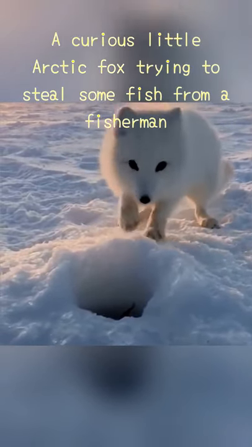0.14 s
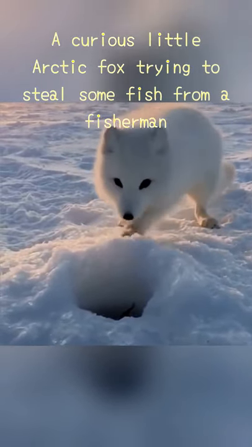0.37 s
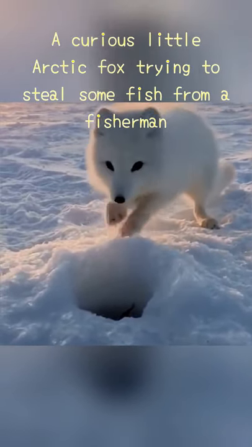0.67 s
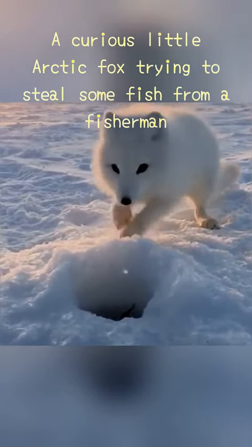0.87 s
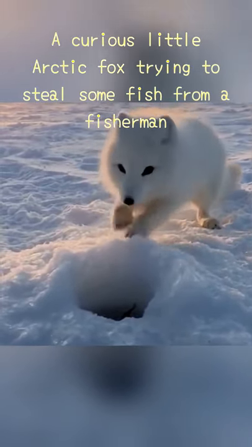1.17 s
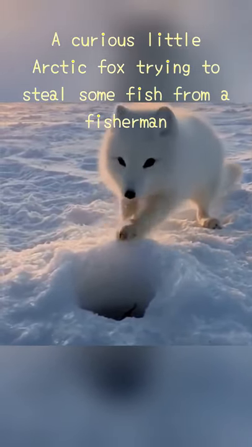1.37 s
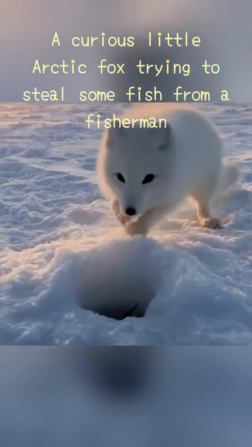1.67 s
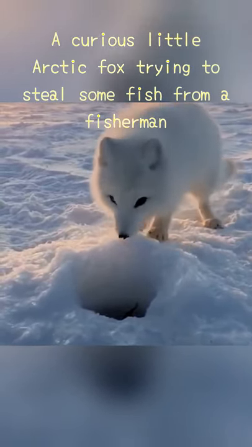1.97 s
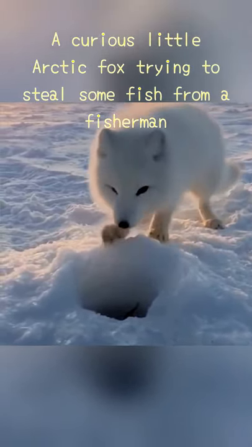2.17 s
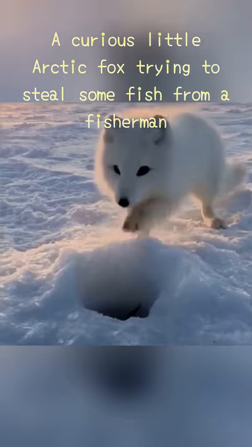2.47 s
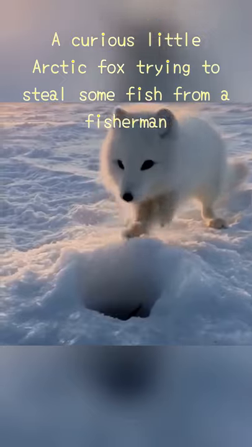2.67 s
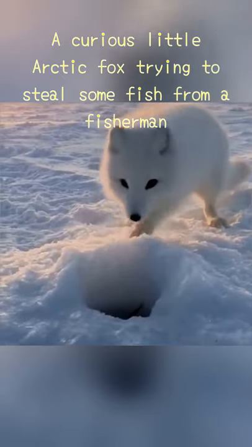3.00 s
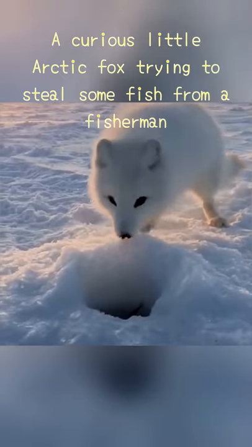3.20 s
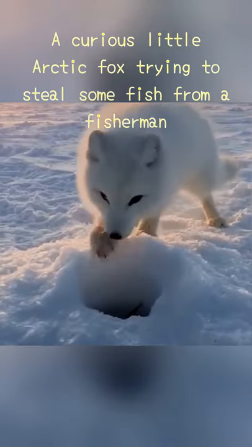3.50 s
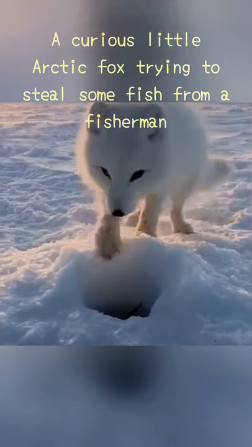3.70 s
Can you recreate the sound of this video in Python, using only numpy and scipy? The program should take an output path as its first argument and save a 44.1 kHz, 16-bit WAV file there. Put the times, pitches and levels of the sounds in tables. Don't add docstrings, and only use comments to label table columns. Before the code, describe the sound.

A fox's paws dig in quick bursts at packed snow, crunching and crackling close up.

```python
import sys
import numpy as np
from scipy import signal
from scipy.fft import rfft, irfft, next_fast_len
from scipy.io import wavfile
from scipy.ndimage import uniform_filter1d

SR = 44100
rng = np.random.default_rng(int(sys.argv[2]) if len(sys.argv) > 2 else 0)


def waveform_to_disk(signal):
    frames = np.transpose(np.atleast_2d(signal))
    scaled = np.clip(frames, -1, 1) * 32767
    samples = np.round(scaled).astype(np.int16)
    wavfile.write(sys.argv[1], SR, samples)


def voltage_ratio(level):
    return 10 ** (np.asarray(level, float) / 20)


N = 169785

# freq_hz, level_db
AIR_CURVE = [(120, -32), (200, -17), (500, -11.5), (900, -16), (5000, -20), (9000, -23.5), (12200, -30),
             (15500, -20)]
# freq_hz, level_db
WIND_CURVE = [(12, -45), (20, -30), (37, -3.5), (76, -5.5), (107, -3), (156, -11), (400, -29.5), (520, -42),
              (880, -120)]
# centre_s, half_width_s, level_db, pitch_hz
BUFFETS = [
    (3.79, 0.055, -47, 65),
    (2.168, 0.0028, -55.5, 450),
    (1.91, 0.018, -49, 110),
]
# freq_hz, level_db
CRUST_CURVE = [(500, -9), (1000, -7), (1400, -6.5), (3000, -3), (5500, -4.5), (8300, -5.5), (10500, -3),
               (12600, -4.5)]
# freq_hz, level_db
PACK_CURVE = [(35, -14), (60, -2.5), (150, -2.5), (340, -2.5), (534, -11), (900, -18), (1170, -68),
              (1980, -120)]
HOLLOW_RINGS_HZ = [1307, 1470, 1633, 2620, 3240]
# start_s, peak_db, pitch_hz
CRUMB_FALLS = [(0.1075, -47, 1330), (0.1125, -48.5, 8900), (0.264, -60, 8600), (0.168, -43, 10500),
               (0.1757, -37, 11200), (0.201, -44.5, 10300), (0.233, -52, 1300), (1.1242, -42, 1430),
               (1.1494, -32, 6430), (1.1498, -35, 2180), (1.1717, -32, 10100), (1.2463, -40.5, 2120),
               (1.965, -49, 1080), (2.0656, -45, 6600), (2.0822, -43, 12600), (2.1655, -54.5, 1260),
               (3.2055, -41, 3440), (3.2306, -40, 6150), (3.3114, -49, 2040), (3.438, -67, 11000),
               (3.491, -49, 12000), (3.5313, -47, 11900)]
# start_s, peak_db, pitch_hz
CRUST_SNAPS = [(0.3556, -28, 2500), (0.5066, -33, 2720), (0.701, -20.5, 10400), (0.7443, -25, 2820),
               (0.8225, -14, 10300), (0.858, -16.5, 1940), (1.2991, -20.5, 10400), (1.513, -17, 12500),
               (1.537, -25, 9900), (1.5428, -17.5, 10600), (1.6232, -25, 2550), (1.6543, -15, 10350),
               (1.7454, -15.5, 10700), (2.3233, -11.5, 10000), (2.3414, -20, 1910), (2.4185, -19, 12100),
               (2.4309, -16, 9340), (2.6782, -18.5, 2220), (2.7613, -18, 10200), (2.8811, -14, 12370),
               (2.8918, -37, 1380), (2.9924, -18.5, 3380), (3.1221, -21.5, 1470), (3.6391, -21.5, 4650),
               (3.691, -16, 10800), (3.8444, -29, 6000)]
# start_s, peak_db, pitch_hz
FOOTFALLS = [(0.004, -41, 205), (0.377, -39, 146), (0.53, -39, 167), (0.614, -38.5, 230), (0.74, -40, 143),
             (0.838, -36.5, 360), (0.966, -43, 91.5), (1.331, -34.5, 294), (1.395, -40, 342),
             (1.649, -33, 197.5), (1.749, -40.5, 279), (1.871, -41, 253), (2.318, -34.5, 160),
             (2.44, -36, 154), (2.522, -36.5, 242), (2.69, -37, 77.5), (2.765, -34, 350), (2.865, -42, 220),
             (2.976, -39.5, 303), (3.111, -36, 328), (3.647, -35, 91), (3.689, -41, 106)]
# start_s, peak_db
CLAW_CATCHES = [(0.0224, -45), (0.175, -52), (0.413, -33), (0.5387, -30), (0.5774, -41), (0.7076, -31),
                (0.842, -23), (0.8463, -25), (0.874, -27), (0.8819, -46), (1.006, -28), (1.279, -37),
                (1.3088, -23), (1.3185, -23), (1.402, -26), (1.4674, -46), (1.509, -24), (1.5489, -27),
                (1.6364, -30), (1.646, -34), (1.663, -37), (1.731, -24), (1.7365, -21), (1.7684, -43),
                (1.8004, -54), (1.8363, -51), (1.845, -44), (1.8971, -50), (2.2453, -41), (2.2775, -27),
                (2.301, -40), (2.3543, -46), (2.382, -31), (2.404, -21), (2.4477, -20), (2.5856, -41),
                (2.613, -29), (2.6345, -23), (2.6602, -51), (2.78, -26), (2.8198, -43), (2.85, -35),
                (2.858, -29), (2.873, -26), (2.9233, -45), (2.9446, -28), (2.978, -29), (2.9834, -36),
                (3.0049, -44), (3.1625, -36), (3.167, -29), (3.2051, -33.5), (3.2324, -38), (3.5878, -31),
                (3.6148, -30), (3.662, -33), (3.7088, -23), (3.8235, -36)]
# start_s, length_s, first_db, last_db
SLIDES = [
    (.66, 0.074, -52.5, -49.5),
    (1.12, 0.14, -56, -70),
    (1.9, 0.16, -51, -70),
    (3.165, 0.062, -51, -59),
    (3.215, 0.153, -59.5, -62.5),
    (1.482, 0.03, -69, -41),
    (2.06, 0.035, -67, -59.5),
    (1.69, .03, -81, -53),
    (2.642, 0.033, -58, -56),
    (2.19, 0.061, -59.5, -55),
]
# start_s, length_s, force_db
LIGHT_SCUFFS = [(0.034, 0.036, -60), (0.321, 0.0048, -56), (0.327, 0.016, -50.5), (0.346, 0.021, -46),
                (0.416, 0.053, -50.5), (0.475, 0.026, -47), (0.552, 0.064, -50.5), (0.698, 0.013, -44),
                (0.778, 0.043, -50.5), (0.914, 0.01, -48.5), (0.928, 0.019, -41.5), (0.95, 0.013, -52.5),
                (1.019, 0.07, -54.5), (1.276, 0.023, -51.5), (1.603, 0.023, -47), (1.707, .02, -55),
                (1.795, 0.061, -52.5), (1.836, 0.021, -52.5), (1.87, 0.039, -45.5), (2.203, 0.043, -65),
                (2.243, 0.032, -49), (2.38, 0.033, -46), (2.557, 0.054, -51.5), (2.72, 0.023, -52.5),
                (2.813, 0.015, -49), (2.736, 0.01, -62), (2.837, 0.021, -43), (2.915, 0.048, -47.5),
                (3.033, 0.012, -49.5), (3.046, 0.032, -62.5), (3.079, 0.027, -51.5), (3.144, 0.025, -45),
                (3.587, 0.014, -50.5), (3.607, 0.034, -52), (3.788, 0.02, -54), (3.82, 0.016, -52),
                (3.841, 0.02, -46.5)]
# start_s, length_s, force_db, thud_re_crackle_db, peak_place_0_1
DIG_STROKES = [
    (-.02, 0.053, -40, -16, 0.29),
    (0.369, 0.055, -42, -9.5, 0.56),
    (0.502, 0.045, -38.5, -9, 0.42),
    (0.607, 0.061, -40, -11, 0.56),
    (0.728, 0.05, -40.5, -3.5, 0.55),
    (0.807, 0.025, -52, -17, 1),
               (0.835, 0.052, -40.5, -5.5, 0.57), (0.961, 0.053, -41, -6, 0.3),
               (1.297, 0.068, -40, -6.5, 0.66), (1.364, 0.1, -40.5, -8.5, 0.56),
               (1.504, 0.09, -40.5, -8, 0.47), (1.622, 0.07, -41.5, -6.5, 0.55),
               (1.723, 0.073, -40.5, -5.5, 0.58), (2.275, 0.088, -38.5, -9, 0.55),
               (2.41, 0.07, -38.5, -9.5, 0.24), (2.485, 0.081, -40.5, -7.5, 0.59),
               (2.61, 0.031, -40, -10, 0.66), (2.67, 0.053, -42.5, -6, 0.33),
               (2.75, 0.064, -40, -5.5, 0.18), (2.859, 0.058, -38.5, -10.5, 0.5),
               (2.965, 0.066, -39.5, -7.5, 0.32), (3.101, 0.043, -43.5, -5.5, 0.37),
               (3.633, 0.082, -41.5, -6, 0.2)]


def evened(x):
    return x / np.sqrt(np.mean(x ** 2) + 1e-20)


def colour(x, points):
    f, level_db = np.transpose(points)
    hz = np.fft.rfftfreq(len(x), 1 / SR)
    gain = voltage_ratio(np.interp(np.log(hz + 1), np.log(f + 1), level_db))
    return evened(irfft(rfft(x) * gain, len(x)))


def add(mix, start_s, sound):
    at = round(start_s * SR)
    part, rest = mix[max(at, 0):], sound[max(-at, 0):]
    size = min(len(part), len(rest))
    part[:size] += rest[:size]


def wander(period_s):
    size = max(int(period_s * SR), 2)
    return evened(uniform_filter1d(uniform_filter1d(rng.standard_normal(N), size), size))


def linger(x, decay_s):
    keep = np.exp(-1 / (decay_s * SR))
    return signal.lfilter([1 - keep], [1, -keep], x)


def impacts(rate_per_s, spread_db, limit):
    size = voltage_ratio(spread_db * np.minimum(rng.exponential(1, N), limit))
    return size * (rng.random(N) < rate_per_s / SR)


def crust_noise():
    return colour(rng.standard_normal(N), [(150, -76), *CRUST_CURVE])


def air():
    hiss_db, wind_db, lumpy_db = -75, -70, 5
    t = np.arange(N) / SR
    hiss = voltage_ratio(hiss_db + 1.4 * wander(0.0018)) * colour(rng.standard_normal(N), AIR_CURVE)
    wind = voltage_ratio(wind_db + lumpy_db * wander(0.069)) * colour(rng.standard_normal(N), WIND_CURVE)
    for centre_s, half_width_s, level_db, hz in BUFFETS:
        swell = np.exp(-((t - centre_s) / half_width_s) ** 2)
        wind += voltage_ratio(level_db) * swell * np.sin(2 * np.pi * hz * (t - centre_s))
    return hiss + wind


def grit():
    hits = voltage_ratio(-72) * impacts(rate_per_s=160, spread_db=5.1, limit=2)
    return linger(hits, 0.0014) * 0.00087 * SR * crust_noise()


def ticks(table, t60_s, tone, gain_db):
    out, t = np.zeros(N), np.arange(600) / SR
    burst = signal.lfilter([1, -0.6], [1], rng.standard_normal((len(table), 600)), axis=1)
    for (start_s, peak_db, hz), noise in zip(table, burst):
        smear_s = 1 / (2 * np.pi * 3.2 * hz)
        wide = evened(linger(linger(noise, smear_s), smear_s))
        crack = tone * np.sin(2 * np.pi * hz * t) + (1 - tone) * wide
        attack = np.minimum(t / 0.00065, 1) ** 2
        add(out, start_s, voltage_ratio(peak_db + gain_db - 60 * t / t60_s) * attack * crack)
    return out


def chunks():
    spread, turns = 0.07, 2.9
    pitches_hz = np.outer(HOLLOW_RINGS_HZ, [1 - spread, 1, 1 + spread]).ravel()
    size = impacts(rate_per_s=900, spread_db=4, limit=4)
    kind, t, out = rng.integers(0, len(pitches_hz), N), np.arange(1200) / SR, np.zeros(N)
    for k, hz in enumerate(pitches_hz):
        grain = np.sin(2 * np.pi * hz * t) * np.exp(-t * hz / turns) * np.minimum(t * hz, 1)
        out += signal.oaconvolve(size * (kind == k), grain / np.linalg.norm(grain))[:N]
    return evened(out)


def thumps():
    lag_s, width_s, gain_db, sag = 0.011, 0.007, -7, 0.13
    out, t = np.zeros(N), np.arange(2000) / SR
    place = (t - lag_s) / width_s
    bump = np.exp(-place ** 2) * np.minimum(t / 0.0017, 1)
    for start_s, peak_db, hz in FOOTFALLS:
        turns = np.cumsum(hz * (1 - sag * place)) / SR + rng.random()
        add(out, start_s, voltage_ratio(peak_db + gain_db) * bump * np.sin(2 * np.pi * turns))
    return out


def thud():
    lump_db = 4
    return colour(rng.standard_normal(N) * voltage_ratio(lump_db * wander(0.0069)), PACK_CURVE)


def catches():
    rise_s, decay_s, gain_db = 0.00053, 0.00081, -8.5
    out, t = np.zeros(N), np.arange(500) / SR
    burst = np.minimum(t / rise_s, 1) ** 2 * np.exp(-np.maximum(t - rise_s, 0) / decay_s)
    for start_s, peak_db in CLAW_CATCHES:
        add(out, start_s, voltage_ratio(peak_db + gain_db) * burst)
    return out * crust_noise()


def slips():
    rate_per_s, decay_s, floor = 520, 0.0013, 1.7
    t = np.arange(800) / SR
    kicks = np.minimum(rng.exponential(1, N), 2) * (rng.random(N) < rate_per_s / SR)
    surge = signal.oaconvolve(kicks, np.minimum(t / 0.00016, 1) * np.exp(-t / decay_s))[:N]
    return floor + evened(abs(surge))


def crackle(count=24):
    powder_db = 2
    size = impacts(rate_per_s=5000, spread_db=3.5, limit=4.5)
    kind, t, out = rng.integers(0, count, N), np.arange(256) / SR, np.zeros(N)
    for k, hz in enumerate(np.geomspace(900, 15000, count)):
        turns = (0.2 + rng.random()) * (1 + hz / 9000)
        grain = np.sin(2 * np.pi * hz * t + rng.random()) * np.exp(-t * hz / turns)
        grain *= np.minimum(t * hz * 2, 1)
        out += signal.oaconvolve(size * (kind == k), grain / np.linalg.norm(grain) * np.sqrt(hz))[:N]
    mix = evened(out) + voltage_ratio(powder_db) * rng.standard_normal(N)
    return colour(mix * slips(), [(150, -67), *CRUST_CURVE])


def patchy(x, depth_db):
    z = signal.stft(x, nperseg=256)[2]
    field = uniform_filter1d(rng.standard_normal(z.shape), size=5, axis=0)
    field = uniform_filter1d(field, size=9, axis=1)
    y = signal.istft(z * voltage_ratio(depth_db * evened(field)), nperseg=256)[1][:N]
    power = uniform_filter1d(uniform_filter1d(y ** 2, size=600), size=600)
    return evened(y / np.sqrt(abs(power) + 1e-12))


def arc(length_s, peak, rise_db, fall_db, edge_s):
    t = np.arange(-edge_s, length_s + edge_s, 1 / SR)
    at = np.clip(peak, 0.02, 0.98) * length_s
    shape = voltage_ratio(np.interp(t, [0, at, length_s], [rise_db, 0, fall_db]))
    edge = np.minimum(t + edge_s, length_s + edge_s - t) / (2 * edge_s)
    return evened(shape) * np.clip(edge, 0, 1) ** 2


def pressure():
    edge_s, pack_lag_s, pack_smear_s = 0.0019, 0.0065, 0.02
    crust, pack = np.zeros(N), np.zeros(N)

    def press(start_s, push, thud_db):
        add(crust, start_s - edge_s, push)
        add(pack, start_s + pack_lag_s, push * voltage_ratio(thud_db))

    for start_s, length_s, force_db, thud_db, peak in DIG_STROKES:
        press(start_s, voltage_ratio(force_db) * arc(length_s, peak, -8, -10, edge_s), thud_db)
    for start_s, length_s, force_db in LIGHT_SCUFFS:
        press(start_s, voltage_ratio(force_db) * arc(length_s, 0.052, -0.16, -4.5, edge_s), -6.5)

    settle = voltage_ratio(-30) * linger(crust, 0.17)
    settled = crust + settle
    crust = settled + voltage_ratio(-7) * linger(crust, 0.008)
    for start_s, length_s, first_db, last_db in SLIDES:
        size = round(length_s * SR)
        slide = voltage_ratio(np.linspace(first_db, last_db, size)) * signal.windows.tukey(size, 0.3)
        add(crust, start_s, slide)
        add(pack, start_s, slide * voltage_ratio(-6.5))
    return crust, uniform_filter1d(pack, max(int(pack_smear_s * SR), 2))


def scene():
    crust, pack = pressure()
    loose = voltage_ratio(-13) * linger(crust, 0.0029)
    bright = crust * (crust / voltage_ratio(-1.5)) ** 0.08
    dig = bright * patchy(crackle(), depth_db=3) + voltage_ratio(-1) * pack * thud() + loose * chunks()
    dig += ticks(CRUST_SNAPS, t60_s=0.0059, tone=0.47, gain_db=1.5)
    dig += ticks(CRUMB_FALLS, t60_s=0.0094, tone=0.43, gain_db=1.5)
    return (dig + air() + catches() + thumps() + grit())[None]


def low_pass(x):
    return signal.sosfilt(signal.butter(12, 16710, fs=SR, output="sos"), x)


def record(dry):
    notch_hz, notch_width_hz, notch_depth, low_cut_hz = 3175, 140, 0.57, 39
    shelf_hz, edge_hz, shelf_db, dip_db = 12950, 15900, -10.5, -5
    size = next_fast_len(N + 4096)
    hz = np.fft.rfftfreq(size, 1 / SR)
    points_hz = [shelf_hz - 200, shelf_hz + 300, shelf_hz + 1000, edge_hz - 100, edge_hz + 150]
    gain = voltage_ratio(np.interp(hz, points_hz, [0, shelf_db + dip_db, shelf_db, shelf_db - 0.5, -70]))
    gain *= 1 - notch_depth * np.exp(-((hz - notch_hz) / notch_width_hz) ** 2)
    gain /= np.sqrt(1 + (low_cut_hz / (hz + 1)) ** 4)
    mix = irfft(rfft(dry, size) * gain, size)[:, :N]
    return low_pass(mix)


dry = scene()
out = record(dry)
waveform_to_disk(out)
```